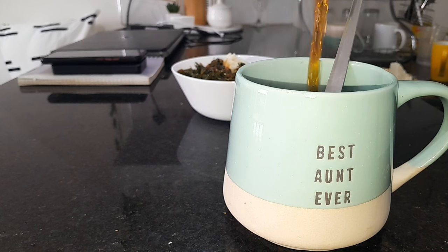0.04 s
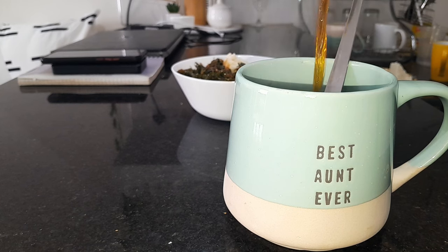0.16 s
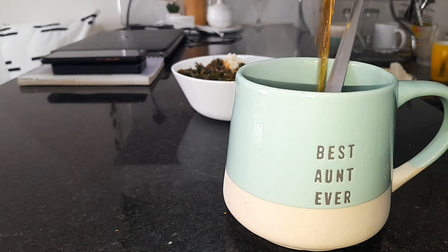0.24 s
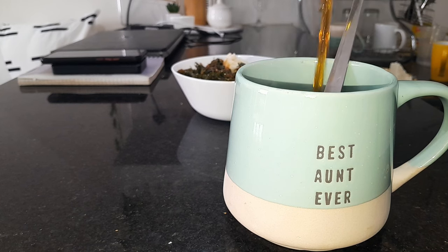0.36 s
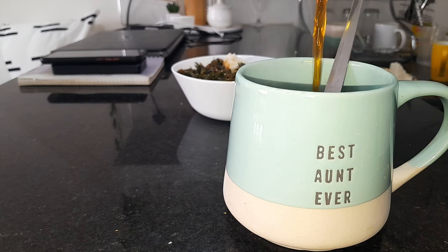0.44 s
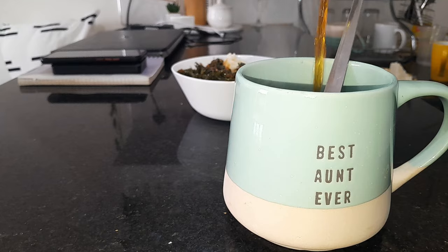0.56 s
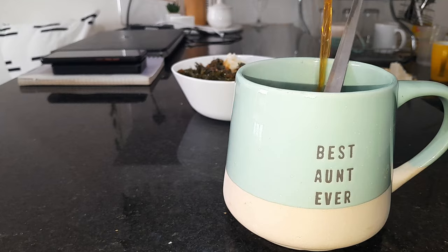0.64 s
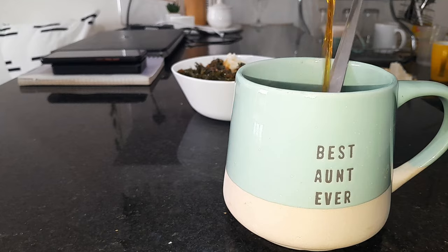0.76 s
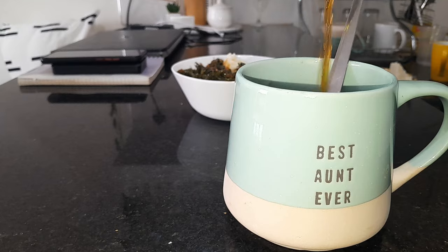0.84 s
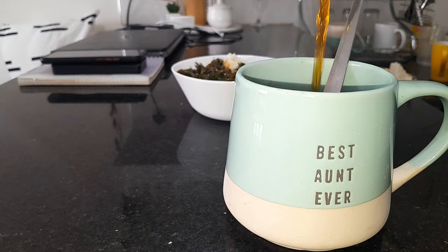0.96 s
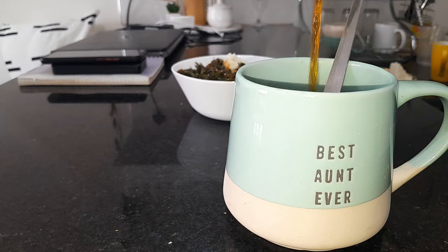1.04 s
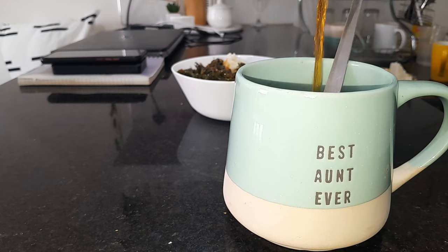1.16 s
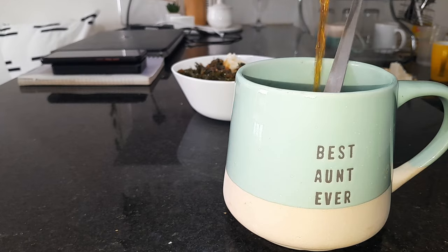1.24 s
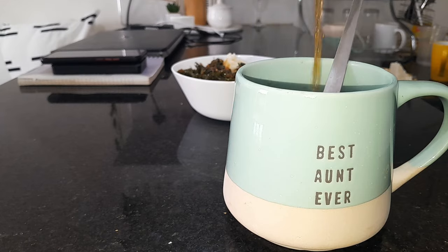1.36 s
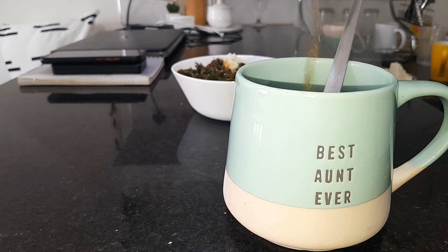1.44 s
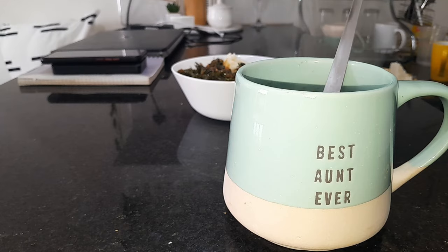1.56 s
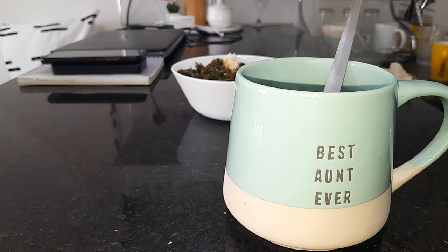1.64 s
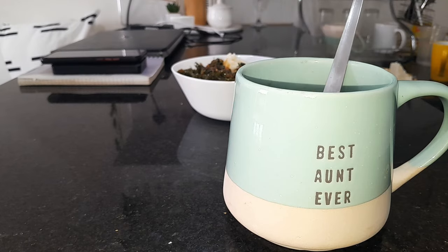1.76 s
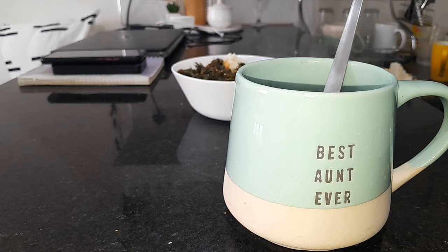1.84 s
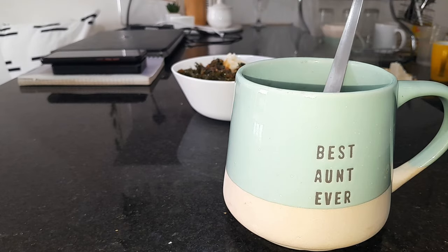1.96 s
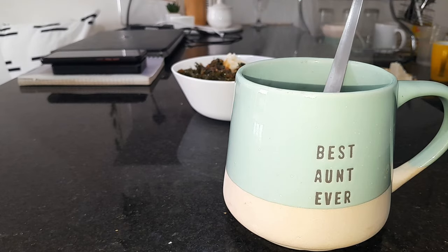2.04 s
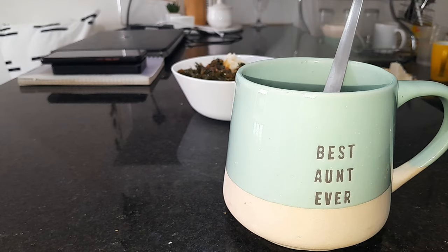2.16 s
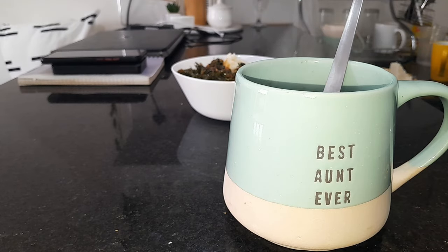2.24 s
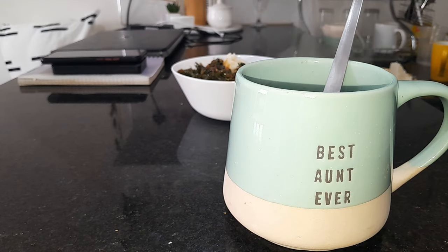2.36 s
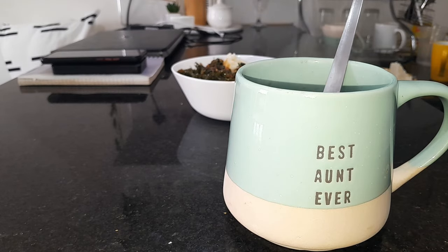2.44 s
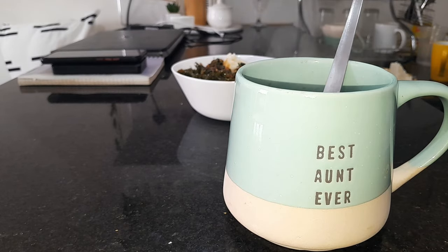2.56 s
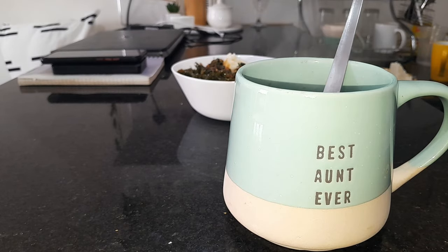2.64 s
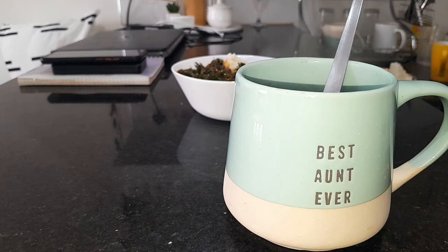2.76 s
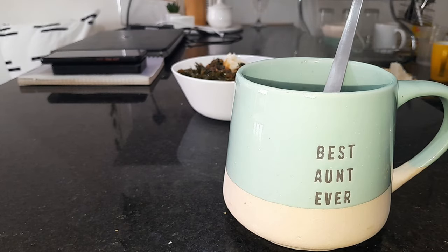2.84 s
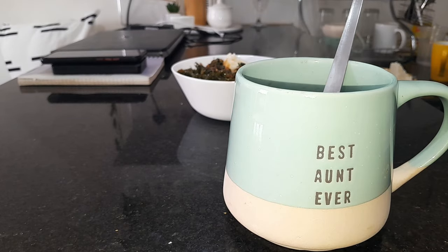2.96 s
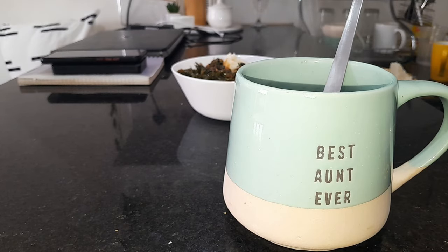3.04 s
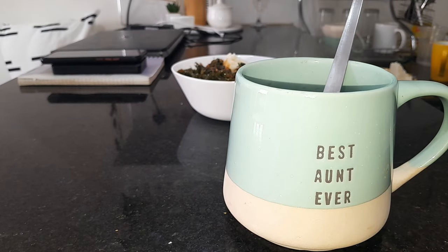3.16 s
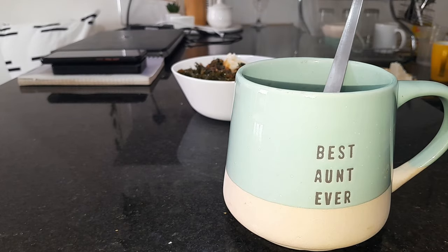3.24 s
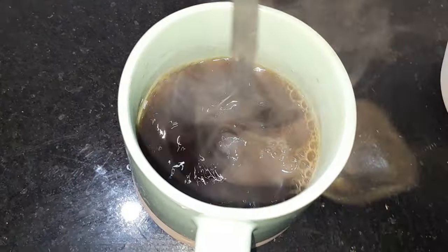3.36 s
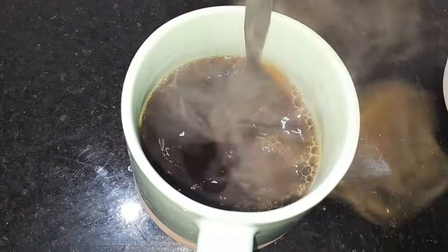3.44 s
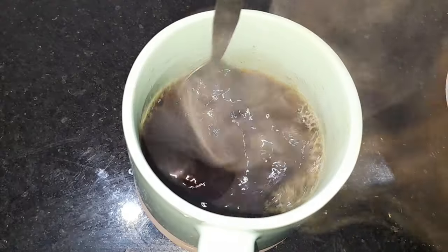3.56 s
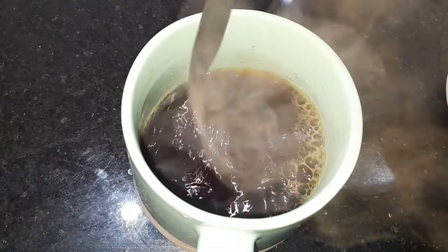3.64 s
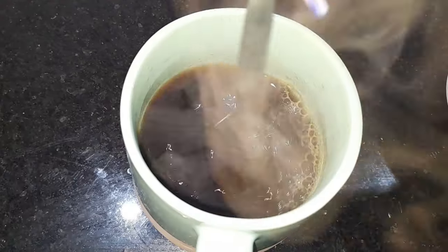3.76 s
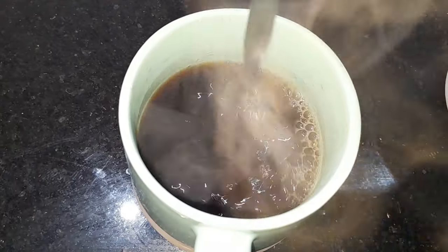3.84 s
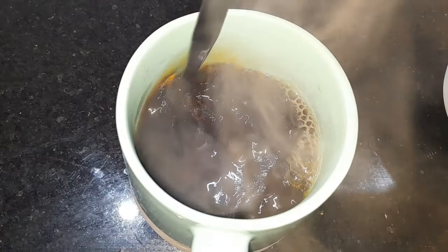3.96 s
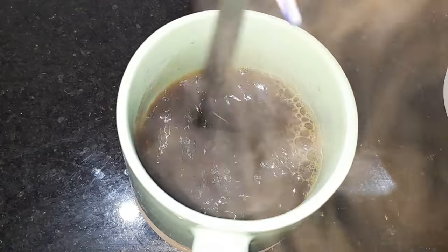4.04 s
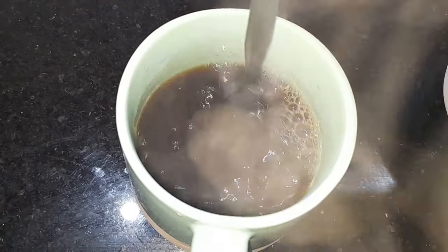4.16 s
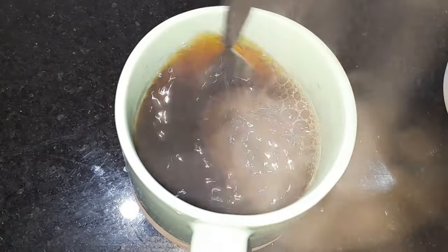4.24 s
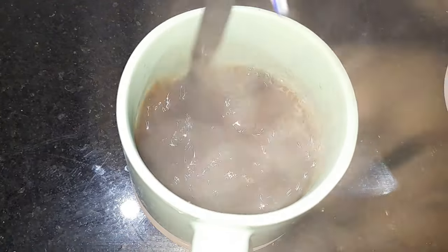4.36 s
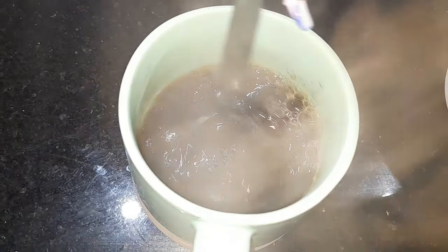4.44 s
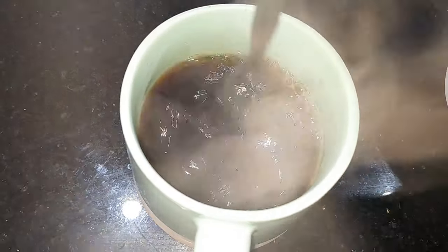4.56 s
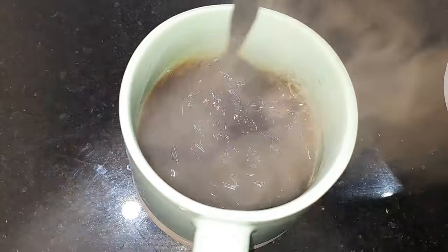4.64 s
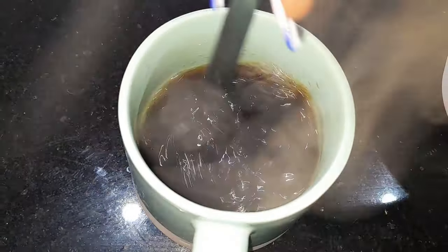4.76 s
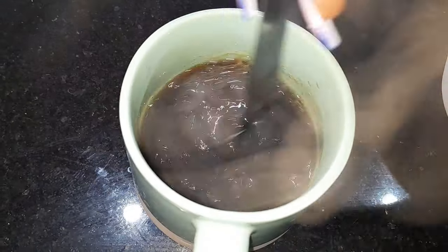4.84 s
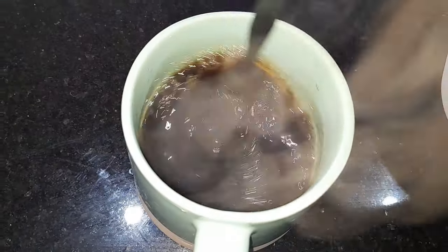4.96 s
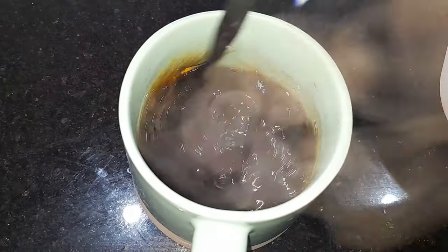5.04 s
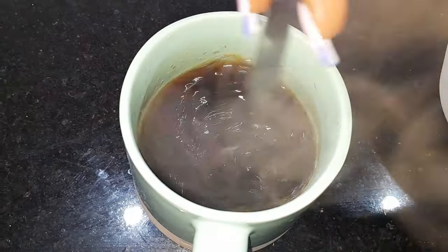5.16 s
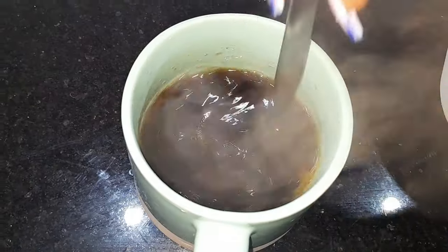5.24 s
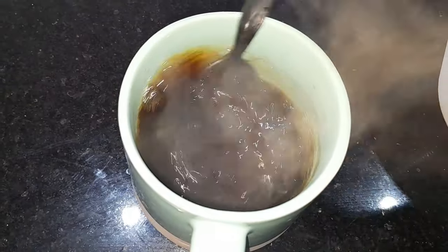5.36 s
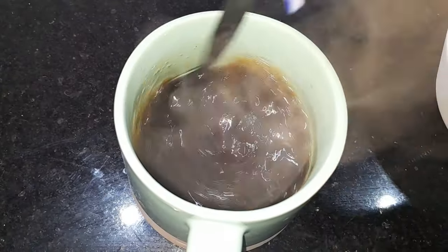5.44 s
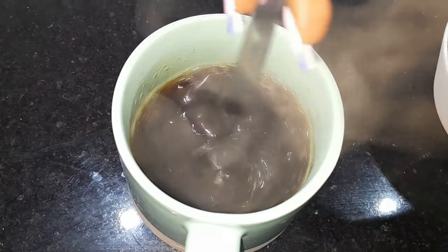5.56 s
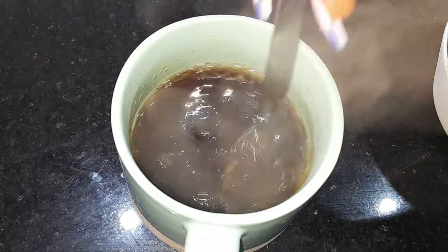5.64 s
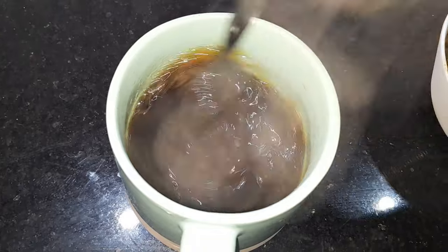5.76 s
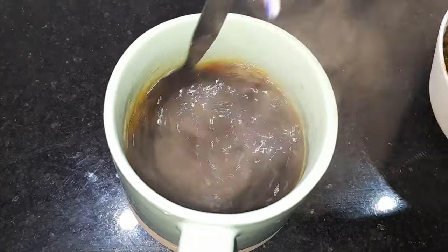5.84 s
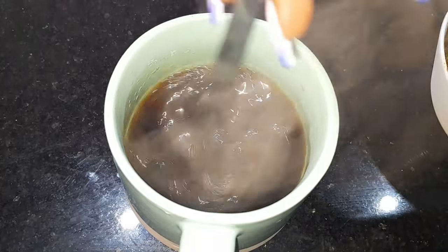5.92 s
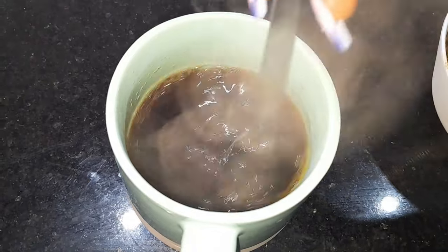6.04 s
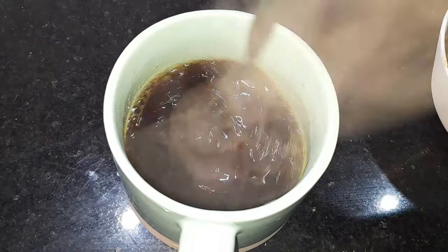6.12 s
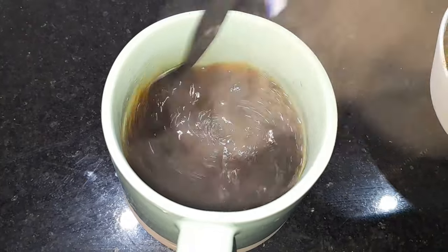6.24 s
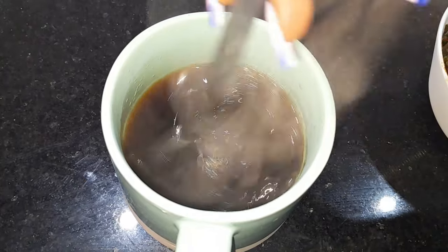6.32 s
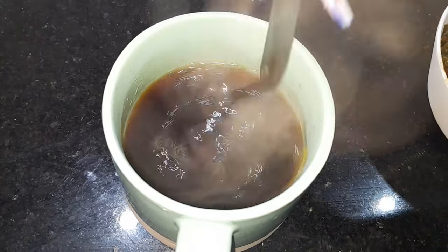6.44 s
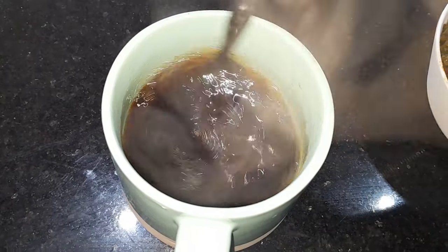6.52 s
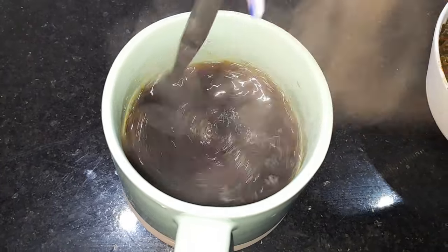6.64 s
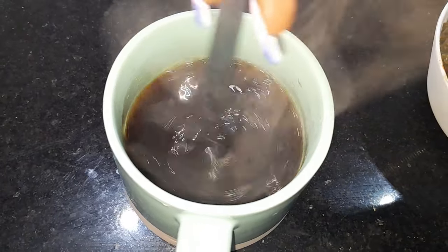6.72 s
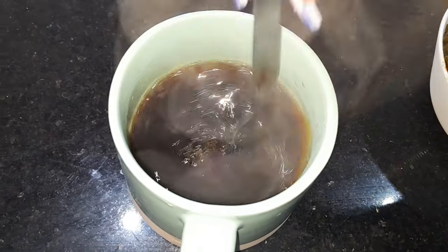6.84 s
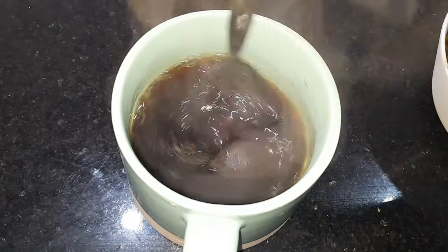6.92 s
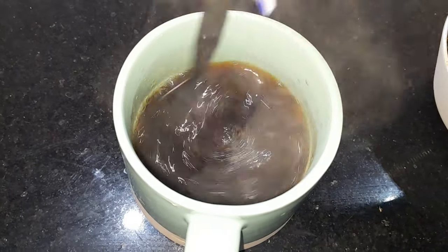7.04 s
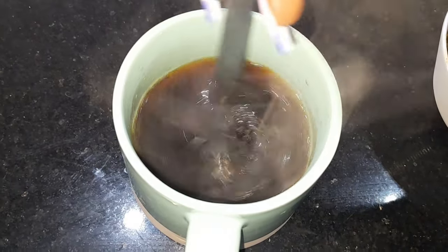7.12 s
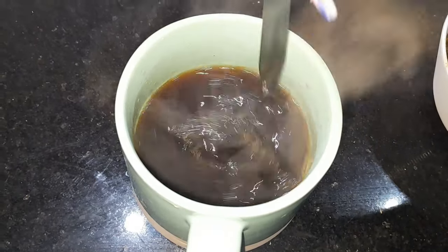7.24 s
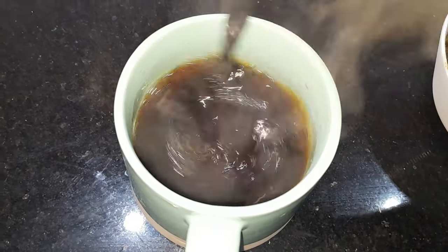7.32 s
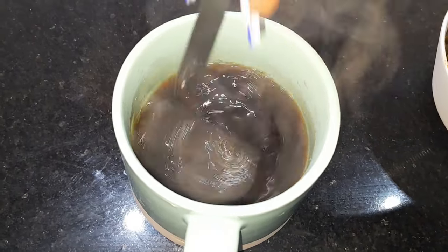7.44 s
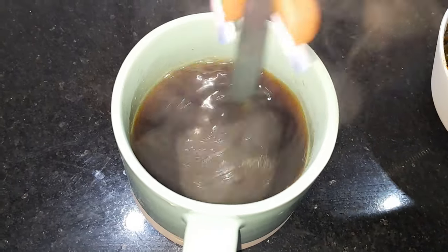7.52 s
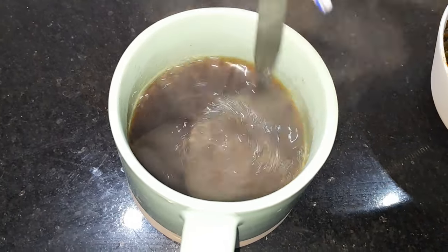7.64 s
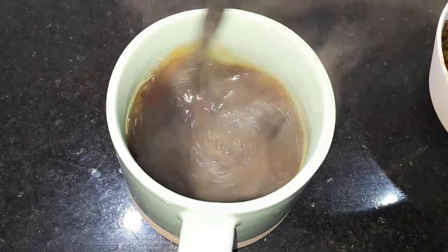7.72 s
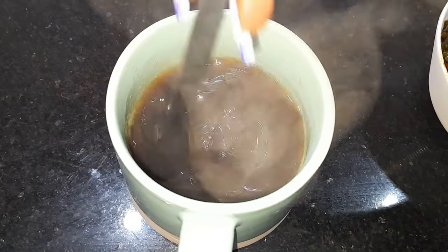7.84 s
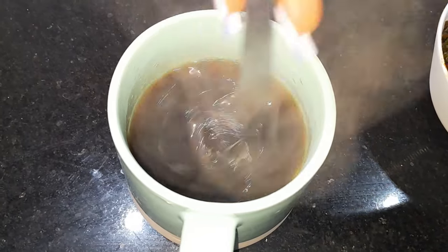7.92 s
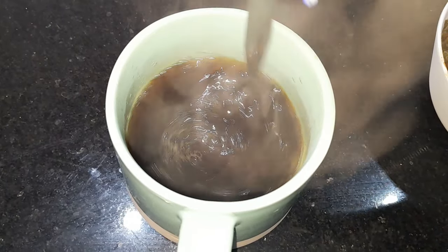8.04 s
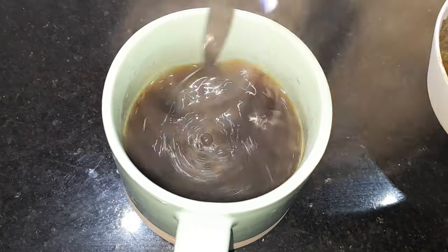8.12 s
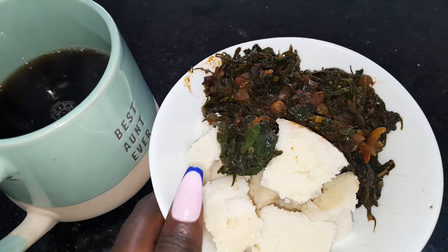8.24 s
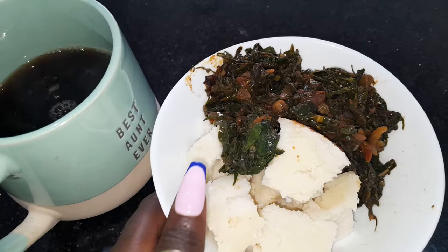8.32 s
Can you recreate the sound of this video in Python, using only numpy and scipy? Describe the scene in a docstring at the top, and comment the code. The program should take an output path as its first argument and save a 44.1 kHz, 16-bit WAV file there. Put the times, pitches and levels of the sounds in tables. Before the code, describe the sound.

Close stereo sound at a stone counter in a small live kitchen. Liquid splashes and burbles into a mug for under two seconds, followed by near silence and a dull bump. After a brief noisy rasp and loud thud, a metal spoon stirs: scattered clinks at first, then denser, brighter ringing taps, gritty drags along the glaze and small liquid plops, until it cuts off.

```python
"""Tea poured and stirred in a ceramic mug

Two close microphones at a stone counter in a small, live kitchen. Tea patters into the mug: drops ring
its air, trap bubbles and throw spray. The pot is set down, a short dry rasp passes, the mug thuds.
Then a steel spoon stirs: each touch ticks, rings the mug's modes and knocks on the counter,
the spoon drags in fine grains, and the swirling tea sloshes and plops. The hard walls answer softly."""
import sys
import numpy as np
from scipy import signal
from scipy.fft import rfft, irfft
from scipy.io import wavfile
from scipy.ndimage import uniform_filter1d

SR = 44100
rng = np.random.default_rng(int(sys.argv[2]) if len(sys.argv) > 2 else 0)


def output_pcm(signal):
    """Save a mono or channel-first signal as 16-bit PCM at the path in sys.argv[1].

    Samples are clipped to [-1, 1] before scaling.
    """
    pcm = np.clip(np.atleast_2d(signal).T, -1, 1) * 32767
    wavfile.write(sys.argv[1], SR, np.round(pcm).astype(np.int16))


N = 369999
TIME = np.arange(N) / SR
STOP_S, EDGE_HZ = 8.3175, 16100  # where the sound stops, and the top of the band

# All dB are relative unless a comment says otherwise.
# Hush of the quiet kitchen. Each row: frequency in Hz, density in dB per Hz.
FLOOR_TONE = [(15, -33), (25, -13.5), (76, -6.5), (99, -11), (161, -16.5), (242, -18), (317, -22),
              (344, -23.5), (384, -23), (560, -25), (2350, -32), (2690, -32), (5880, -37), (8360, -32),
              (16000, -40.5)]
FLOOR_DB = -59.5  # rms of the hush, dB re full scale
# How long the kitchen rings. Each row: frequency in Hz, decay t60 in s.
ROOM_DECAY = [(150, 0.41), (660, 0.32), (1700, 0.28), (4600, 0.34), (9000, 0.26), (15000, 0.45)]
# How alike the two microphones hear noise. Each row: frequency in Hz, likeness from 0 to 1.
LIKENESS = [(40, 0.27), (110, 0.61), (300, 0.91), (700, 0.15), (1500, 0), (3000, 0.34), (7000, 0.0035),
            (15000, 0)]
# Colour of the short rasp. Each row: frequency in Hz, density in dB per Hz.
RASP_TONE = [(35, -68.5), (60, -22), (190, -11), (275, -0.5), (346, -10), (651, -8), (785, -23), (862, -12),
             (1090, -19), (2090, -12.5), (2840, -21.5), (4220, -14.5), (6300, -23), (7200, -28),
             (11500, -38), (14900, -49), (16000, -84)]
RASP_S = 3.346  # start of the rasp
# Colour of the pot set down. Each row: frequency in Hz, density in dB per Hz.
POT_TONE = [(40, -20.5), (80, -18), (112, -6), (150, -30.5), (230, -23), (400, -27), (700, -25),
            (1900, -30), (2800, -46), (8000, -59.5)]
# The counter's boom under the pot. Each row: frequency in Hz, level in dB, decay t60 in s.
BOOM = [(111.6, -29.5, .25), (98, -34.5, .2)]
# Dull blows on the counter. Each row: start in s, rise in s, decay t60 in s, level in dB,
# tilt in dB per octave above 400 Hz.
THUDS = [(3.5118, 0.0016, 0.025, -2, -2.5), (3.5174, 0.0025, 0.19, -16.5, 2),
         (3.528, 0.0023, 0.17, -23, -24.5), (7.167, .002, 0.31, -48, -21.5)]
# Colour of the mug's thud. Each row: frequency in Hz, density in dB per Hz.
THUD_TONE = [(20, -26), (60, -11), (130, -4), (210, -16), (275, 7.5), (340, -9.5), (500, 5.5), (750, 8.5),
             (1050, 14.5), (1400, 3), (2000, -6), (3500, -32), (8000, -42.5)]
# The stream; the deeper it digs, the wider its gurgle. Each row: time in s, gurgle in dB,
# gain outside the core around 1 kHz in dB, spray in dB.
POUR = [(0, -40, -4.5, -67), (.17, -40.5, -25, -63), (.21, -36, -13.5, -50.5), (.35, -38, -1.5, -48.5),
        (.8, -42, 2, -44), (.93, -44, 1, -52), (1.1, -40.5, 0.5, -49), (1.3, -43.5, 8, -46.5),
        (1.42, -33, 4, -50.5), (1.63, -39, -1, -50.5)]
POUR_END_S, POUR_FALL_DB_PER_S = 1.635, 900  # the stream breaks off
# Drops heard through the air in the mug. Each row: frequency in Hz, density in dB per Hz.
GURGLE_TONE = [(100, -13.5), (230, -17), (330, -7), (570, 4), (760, -5.5), (1020, 6), (1250, -5),
               (1600, -12), (2150, -24.5), (2580, -4), (3150, -26), (5000, -32)]
# Fine spray. Each row: frequency in Hz, density in dB per Hz.
SPRAY_TONE = [(1200, -5), (2600, -12.5), (3800, -9), (5000, -8.5), (5800, -5.5), (7000, 9), (8400, -1),
              (9600, 0), (11000, -5), (16000, -6.5)]
# Small bubbles under the stream. Each row: pitch in Hz, level in dB.
BUBBLES = [(330, -8), (570, -13.5), (750, -5), (1020, 8.5), (1350, -6)]
# The wall of the filling mug, set singing by spray. Each row: pitch in Hz, level in dB.
WALL_TONE = [(4600, -11), (4950, 15), (5350, -30)]
# Big drops in the stream. Each row: start in s, gurgle in dB, spray in dB.
DROPS = [(0.187, -25.5, -23), (.307, -11, -15), (0.384, -18, -23), (.421, -19, -40), (.518, -16.5, -42),
         (.538, -16, -20.5), (0.583, -17, -36), (.679, -15.5, -40), (.746, -18, -32), (0.763, -13.5, -45),
         (.791, -9.5, -25), (.96, -21.5, -15.5), (1.118, -30, -11.5), (1.183, -17, -43),
         (1.281, -22.5, -13), (1.36, -21, -16), (1.474, -22, -18.5), (1.546, -16, -44),
         (1.597, -17.5, -16.5)]
# Trapped air pockets. Each row: start in s, peak in dB, starting pitch in Hz.
PLOPS = [(0.065, -27.5, 956), (.232, -23.5, 1000), (.24, -24, 1020), (.421, -24, 960), (.759, -20, 1080),
         (1.183, -20, 1180), (1.36, -17.5, 900), (1.521, -27, 945), (1.597, -22, 680), (3.782, -26.5, 840),
         (4.126, -24.5, 1185), (4.395, -27.5, 1020), (4.495, -31, 930), (4.745, -20.5, 1156),
         (4.796, -26.5, 697), (5.213, -28.5, 1220), (5.517, -10.5, 1277), (5.867, -16, 1240),
         (6.045, -29, 1170), (6.123, -21, 1160), (6.79, -26, 1264), (6.9, -17, 1165), (7.804, -24.5, 900),
         (7.923, -24.5, 1210), (8.023, -20, 1264)]
# A bubble swells in about one cycle; its pitch rises by twice the glide as it surfaces.
PLOP_CYCLES, PLOP_GLIDE_PER_S = 1.39, 1.8
# Strokes that churn the tea. Each row: start in s, length in s, level in dB, pitch in Hz.
SWIRLS = [(4.034, 0.09, -46.5, 1035), (4.425, 0.081, -43, 1215), (4.569, 0.11, -53.5, 1135),
          (5.149, 0.057, -46, 1380), (5.986, .15, -48.5, 1110), (6.368, 0.057, -39.5, 1330),
          (6.767, .16, -46, 1187), (7.443, 0.088, -48, 1190), (7.841, 0.086, -37.5, 1190),
          (7.989, 0.048, -43.5, 1345)]
# The spoon dragging along the wall. Each row: start in s, length in s, level in dB.
SCRAPES = [(3.812, .15, -48.5), (3.981, 0.16, -43.5), (4.237, 0.073, -45.5), (4.535, .13, -47.5),
           (4.834, 0.13, -49.5), (4.967, 0.078, -45.5), (5.167, 0.15, -52.5), (5.3, 0.1, -40),
           (5.636, 0.2, -47), (5.723, 0.11, -39.5), (5.954, 0.0234, -35.5), (6.123, 0.093, -35.5),
           (6.317, .16, -39.5), (6.484, 0.11, -39), (6.794, 0.11, -46), (7.271, 0.16, -42),
           (7.423, 0.24, -43.5), (7.675, 0.13, -46.5), (7.83, 0.13, -38.5), (7.971, .12, -39.5)]
# Grit under the sliding spoon. Each row: pitch in Hz, level in dB.
GRIT_TONE = [(1500, -3.5), (3000, -14.5), (5000, -5), (7000, -4.5), (9500, -9.5), (11700, -3.5),
             (13500, -11.5), (16000, -7)]
SKIPS_PER_S, SKIP_DB = 26, 11  # the dragging spoon skips and taps lightly, against the scrape
# Spoon touches on the mug. Each row: start in s, tick in dB, tick brightness in dB per octave above 400 Hz,
# knock in dB, mug ring in dB, spot in the wall's pattern in degrees, zing in Hz.
CLINKS = [(3.4976, -9, 6.5, -32.5, -30, 145, 7600), (3.579, -24, -1.5, -59.5, -43, 80, 5260),
          (3.7266, -30.5, 7, -36.5, -68, 67, 3400), (3.9731, -18, 1.5, -35.5, -34, 124, 3640),
          (4.2916, -22, 3, -45, -37, 135, 3750), (4.3196, -31, -8, -47, -61, 180, 3550),
          (4.3946, -31.5, -1, -39.5, -46.5, 190, 3100), (4.7443, -18.5, -6, -34, -34, 150, 2000),
          (4.7946, -22.5, -6, -38.5, -50, 280, 2230), (4.958, -24.5, 2.5, -44, -44, 130, 3900),
          (5.1735, -38, -2, -51, -57, 210, 8500), (5.2866, -13, -3, -38, -31.5, 350, 3150),
          (5.5168, -18, -6, -40, -38, 190, 3420), (5.585, -25.5, -7.5, -38.5, -51, 410, 2450),
          (5.7172, -17.5, -3.5, -42.5, -33, 73, 4660), (5.7984, -30, -9.5, -45, -45, 20, 3140),
          (5.812, -27, -8.5, -49, -52, 190, 3840), (5.8451, -25.5, -9, -35, -48, 190, 7380),
          (5.8667, -24, -5, -40, -58, 84, 3450), (5.9127, -30, -4, -40, -44, 220, 2110),
          (5.963, -25.5, 3, -72, -66, 90, 9070), (6.0445, -29.5, 7, -51.5, -63, 50, 9700),
          (6.1229, -16.5, -2, -38, -32.5, 274, 6930), (6.2973, -18.5, -.5, -34.5, -30, 190, 3890),
          (6.4817, -12.5, -2, -37, -29.5, 320, 6970), (6.5585, -22, -4, -44.5, -48, 170, 7000),
          (6.587, -27.5, -1, -44, -41, 300, 3100), (6.6472, -25, -0.5, -40.5, -37, 130, 6900),
          (6.674, -25.5, -6, -40.5, -45.5, 250, 4650), (6.79, -31, 5.5, -44.5, -45.5, 84, 3280),
          (6.9, -13, -4.5, -40, -25.5, 40, 6900), (7.123, -12, -2.5, -37.5, -23, 268, 5050),
          (7.1692, -22, 1.5, -32.5, -35, 290, 6700), (7.2617, -12.5, -3, -39.5, -27.5, 7.2, 7100),
          (7.421, -18, -1.5, -33, -37, 160, 3500), (7.6514, -11, -2, -42, -25.5, 10, 4430),
          (7.8045, -16, 4.5, -33.5, -27, 162, 3780), (7.923, -18, -8, -40.5, -40.5, 140, 5900),
          (8.0203, -13, -2.5, -44.5, -32, 83, 4650), (8.3147, -25.5, 3.5, -40, -46, 250, 4980)]
# Colour of the steel's tick. Each row: frequency in Hz, density in dB per Hz.
TICK_TONE = [(700, -38), (1500, -1.5), (2200, -15), (2900, -1), (3900, -3), (4700, 3), (5800, 0.5),
             (7100, 6), (8200, 2.5), (9500, -2), (11500, 0.5), (13500, -9.5), (16000, -3)]
# Fainter modes of rim and spoon that follow the tick. Each row: frequency in Hz, level in dB, decay t60 in s.
STEEL = [(3250, -10.5, 0.036), (3630, -15, 0.04), (4300, -23, 0.074), (4550, -7, 0.06), (5070, -18, 0.097),
         (6070, -23.5, 0.17), (7100, -9, .12), (7040, -15, 0.064), (7000, -5.5, 0.14), (7890, -28, .1),
         (8960, -4.5, 0.056), (11170, -9.5, 0.062)]
# The mug rocking on the counter. Each row: frequency in Hz, density in dB per Hz.
KNOCK_TONE = [(20, -45), (60, -13), (85, -15.5), (115, -7.5), (190, -16.5), (290, -8.5), (410, -2.5),
              (520, -11), (720, 5), (900, -6), (1300, -4), (2000, -18.5), (3500, -22.5)]
ZING_DB, ZING_CYCLES = -2, 5.9  # the spoon's thin bowl zings briefly, against the tick
SIDE_DB = 0.5  # left-right swing with the spot struck
# The mug's six main modes; the spot struck decides their mix. Each row: frequency in Hz, decay t60 in s,
# level in dB, loudest spot in degrees, swing either way in dB, right microphone's lag in degrees,
# left-right difference in dB.
MUG = [(1526, 0.4, -3.5, 286, 3.5, 55, -2), (1676, 0.35, -5.5, 218, 7, -95, -4),
       (3122, 0.3, -7.5, 315, 4.5, 5.5, -0.5), (3852, 0.11, 1.5, 130, 7, -160, -3.5),
       (4640, 0.16, -5, 9.5, 7, 56.5, 3), (4990, 0.09, -11, 320, 9.5, -30.5, 8)]
SLOSH_DETUNE = 0.0018  # the moving tea shifts the modes a little from blow to blow
PHASE_SCATTER = .17  # turns: the wall's pattern swings round with each blow


def amp(db):
    """Decibels to gain."""
    return 10 ** (np.asarray(db) / 20)


def unit(x):
    """Scales to rms 1."""
    return x / np.sqrt(np.mean(x ** 2) + 1e-20)


def read(points, hz):
    """A table's value on a log-frequency axis."""
    f, value = np.transpose(points)
    return np.interp(np.log(hz + 1), np.log(f), value)


def level(rows, axis=1):
    """Gain over time from a dB column."""
    rows = np.array(rows)
    return amp(np.interp(TIME, rows[:, 0], rows[:, axis]))


def swell(start, attack, hold, t60, db):
    """Gain over time: attack, hold and release."""
    age = TIME - start
    return np.clip(age / attack, 0, 1) * amp(db - 60 * np.maximum(age - attack - hold, 0) / t60)


def add(mix, s, sound):
    """Mixes a sound in at time s."""
    part = mix[:, max(round(s * SR), 0):][:, :sound.shape[-1]]
    part += sound[..., :part.shape[1]]


def noise(spectrum, size, tilt_db=0):
    """Coloured noise of rms 1, with a frequency-dependent likeness at the two microphones."""
    hz = np.fft.rfftfreq(size, 1 / SR)
    a, b = rfft(rng.standard_normal((2, size)))
    same = np.clip(read(LIKENESS, hz), -1, 1)
    pair = np.array([a, same * a + np.sqrt(1 - same ** 2) * b])
    tilt = tilt_db * np.log2(np.maximum(hz, 400) / SR)
    return unit(irfft(pair * amp(read(spectrum, hz) + tilt), size))


def burst(spectrum, t60, rise, tilt_db=0, size=8192):
    """A blow on something with dense, quickly dying modes."""
    t = np.arange(size) / SR
    envelope = (1 - np.exp(-t / rise)) * np.exp(-np.log(1000) * t / t60)
    return noise(spectrum, size, tilt_db) * envelope


def colour(x, spectrum, size=2048):
    """Causal minimum-phase filter: clicks ring in the spectrum's peaks."""
    log_gain = np.log(amp(read(spectrum, abs(np.fft.fftfreq(size, 1 / SR)))))
    response = np.fft.ifft(np.exp(np.conj(signal.hilbert(log_gain)))).real[:size // 2]
    return signal.oaconvolve(x, response[None], axes=1)[:, :x.shape[1]]


def patter(per_s, spread_db, scatter):
    """Random tiny impacts of uneven size, each weighted differently in the two microphones."""
    hits = rng.random(N) < per_s / SR
    size = amp(spread_db * np.minimum(rng.exponential(1, N), 3.5)) * hits
    return size * (rng.choice([-1, 1], N) + scatter * rng.standard_normal((2, N)))


def grains(spectrum, start, stop, per_s, cycles, spread_db, size=300):
    """Tiny impacts, each a short ping of its own pitch, size and direction; rms 1 from start to stop."""
    count = int((stop - start) * per_s)
    when, pitch, height, left, right, pan = rng.random((count, 6)).T[:, :, None]
    hz = np.interp(pitch, [0, 1], [spectrum[0][0], spectrum[-1][0]])
    strength = amp(read(spectrum, hz) + spread_db * np.minimum(-np.log(height), 3.5))
    turns = hz * np.arange(size) / SR
    ping = strength * (1 - np.exp(-2 * turns)) * np.exp(-turns / cycles)
    at = ((start + when * (stop - start)) * SR).astype(int) + np.arange(size)
    out = []
    for share, phase in ((pan, left), (1 - pan, right)):
        heard = ping * np.sqrt(share) * np.sin(2 * np.pi * (turns + phase))
        out.append(np.bincount(at.ravel(), heard.ravel(), N)[:N])
    return unit(np.array(out)) * np.sqrt((stop - start) * SR / N)


def pings(s, db, hz, cycles, glide=0, lag=0.00013, size=1500):
    """A tone that swells and dies within a few cycles, reaching the right microphone a little late."""
    t = np.arange(size) / SR
    age = t * hz / cycles
    turns = hz * (t * (1 + glide * t) - np.array([[0], [lag]]))
    return s, amp(db) * age * np.exp(1 - age) * np.sin(2 * np.pi * turns)


def ring(modes, size=26000, lag=0.00015, scatter=0.25):
    """Dying sines (Hz, dB, t60) that reach the two microphones in different phase."""
    t = np.arange(size) / SR
    out = np.zeros((2, size))
    for hz, db, t60 in modes:
        late = hz * lag + scatter * rng.standard_normal()  # turns
        phase = np.exp(2j * np.pi * (rng.random() - np.array([[0], [late]])))
        out += amp(db) * (phase * np.exp((2j * np.pi * hz - np.log(1000) / t60) * t)).imag
    return out


def patchy(x, patchy_db, patch_hz, patch_s):
    """Resonances come and go: the level drifts in small patches of time and frequency."""
    z = signal.stft(x, nperseg=256, noverlap=192)[2]
    bins, frames = max(round(patch_hz * 256 / SR), 1), max(round(patch_s * SR / 64), 1)
    field = uniform_filter1d(rng.standard_normal(z.shape[1:]), bins, axis=0)
    field = unit(uniform_filter1d(field, frames, axis=1))
    return signal.istft(z * unit(amp(patchy_db * field)), nperseg=256, noverlap=192)[1][:, :N]


def hush():
    """The quiet kitchen: steady noise, strongest in the bass."""
    return amp(FLOOR_DB) * noise(FLOOR_TONE, N)


def kitchen(x, size=28000):
    """Dense reflections from hard walls, each band dying at its own speed."""
    wet = [(150, 0.5), (700, -3.5), (1500, -7), (4000, -7.0), (8000, -12.0), (15000, -10)]  # (Hz, dB)
    taps = noise([(20, 0), (20000, 0)], size) * (np.arange(size) > .004 * SR)  # the first 4 ms are silent
    hz, t, z = signal.stft(taps, SR, nperseg=256)
    rate = np.log(1000) / read(ROOM_DECAY, hz)[:, None]
    z = z * np.exp(-rate * t) * np.sqrt(2 * rate / SR) * amp(read(wet, hz))[:, None]
    return signal.oaconvolve(x, signal.istft(z, SR, nperseg=256)[1], axes=1)[:, :N]


def rasp(bass_late_s=0.045):
    """A short dry rasp of noise that gains body as it goes and stops dead."""
    x = patchy(noise(RASP_TONE, N), patchy_db=2.5, patch_hz=350, patch_s=0.039)
    bass = signal.sosfiltfilt(signal.butter(2, 700, fs=SR, output="sos"), x)
    x = x - bass * (1 - np.clip((TIME - RASP_S) / bass_late_s, 0, 1))
    return x * swell(start=RASP_S, attack=0.0078, hold=0.077, t60=0.014, db=-20.5)


def counter():
    """The pot lands softly and booms the counter; the mug thuds on the stone."""
    out = noise(POT_TONE, N) * swell(start=2.905, attack=0.038, hold=0.03, t60=.085, db=-35.5)
    boom = ring(BOOM, scatter=.03)
    onset = 1 - np.exp(-np.arange(boom.shape[1]) / SR / .025)
    add(out, 2.925, boom * onset)
    for s, rise, t60, db, tilt_db in THUDS:
        add(out, s, amp(db) * burst(THUD_TONE, t60, rise, tilt_db))
    return out


def pour(gurgle_db=-4, bubble_db=-1, spatter_db=0, splash_db=-10, spray_db=-11):
    """Drops of the stream ring the air in the mug, trap bubbles and throw spray; big ones stand out."""
    end = POUR_END_S + .1
    body = unit(colour(patter(per_s=390, spread_db=4.5, scatter=0.44), GURGLE_TONE))
    bubbles = grains(BUBBLES, 0, end, per_s=110, cycles=4.5, spread_db=5.5, size=1800)
    body = body + amp(bubble_db) * bubbles
    core = signal.sosfiltfilt(signal.butter(2, [750, 1400], "band", fs=SR, output="sos"), body)
    body = core + level(POUR, axis=2) * (body - core)
    clumps = abs(uniform_filter1d(rng.standard_normal(N), size=260)) ** 1.85  # spray flies in small bunches
    spray = unit(clumps) * grains(SPRAY_TONE, 0, end, per_s=2800, cycles=1.7, spread_db=3.5, size=120)
    wall = grains(WALL_TONE, 0, end, per_s=500, cycles=16, spread_db=4)
    wall = wall * swell(start=1.274, attack=0.086, hold=.02, t60=.55, db=-44.5)
    out = amp(gurgle_db) * body * level(POUR) + amp(spatter_db) * spray * level(POUR, axis=3) + wall
    out = patchy(out, patchy_db=3, patch_hz=400, patch_s=.02)
    out = out * amp(-POUR_FALL_DB_PER_S * np.maximum(TIME - POUR_END_S, 0))
    for s, db, fine_db in DROPS:
        add(out, s, amp(db + splash_db) * burst(GURGLE_TONE, t60=0.03, rise=0.00055))
        add(out, s, amp(fine_db + spray_db) * burst(SPRAY_TONE, t60=0.017, rise=0.00024))
    return out


def plops():
    """Air pockets trapped by the stream or the spoon ring once."""
    out = np.zeros((2, N))
    for s, db, hz in PLOPS:
        add(out, *pings(s, db, hz, PLOP_CYCLES, PLOP_GLIDE_PER_S))
    return out


def slosh(slosh_db=-1, width_hz=110):
    """Small bubbles ring the air above the swirling tea."""
    out = np.zeros((2, N))
    bubbles = patter(per_s=200, spread_db=5.0, scatter=0.54)
    for s, length, db, hz in SWIRLS:
        cavity = signal.iirpeak(hz, hz / (2 * width_hz), SR)
        part = bubbles[:, int(s * SR):][:, :int(length * SR)]
        churn = signal.lfilter(*cavity, signal.lfilter(*cavity, part))
        add(out, s, amp(db + slosh_db) * unit(churn * signal.windows.tukey(part.shape[1], .6)))
    return out


def drag(drag_db=-2, slip_db=4.0, skip_ring_db=-10):
    """The spoon slips over the glaze in fine grains and skips, each skip a light tap."""
    pressure = np.zeros((1, N))
    for s, length, db in SCRAPES:
        add(pressure, s, amp(db + drag_db) * signal.windows.tukey(int(length * SR), .5))
    drift = unit(uniform_filter1d(rng.standard_normal(N), size=400))
    slips = unit(amp(slip_db * drift))  # the spoon catches and slides
    grit = grains(GRIT_TONE, 0, N / SR, per_s=6000, cycles=6, spread_db=3, size=120)
    grit = patchy(grit, patchy_db=4.5, patch_hz=800, patch_s=.025)
    skips = pressure * rng.random(N) * (rng.random(N) < SKIPS_PER_S / SR)
    tap = burst(TICK_TONE, t60=.012, rise=.0003) + amp(skip_ring_db) * ring(STEEL, size=8192)
    taps = signal.oaconvolve(skips, tap, axes=1)[:, :N]
    return pressure * slips * grit + amp(SKIP_DB) * taps


def clinks(tick_db=4.5, steel_db=-14, knock_db=2, tick_t60=0.019):
    """Steel ticks on the glaze, rings rim and spoon, and rocks the mug on the counter."""
    out = np.zeros((2, N))
    for s, db, bright, rock_db, ring_db, spot, zing_hz in CLINKS:
        side = unit(amp(SIDE_DB * np.cos(np.radians(spot)) * np.array([[.5], [-.5]])))
        tick = burst(TICK_TONE, t60=tick_t60, rise=0.00058, tilt_db=bright)
        add(out, s, amp(db + tick_db) * side * tick)
        add(out, *pings(s, db + ZING_DB, zing_hz, ZING_CYCLES))
        # the grip and the depth of the spoon shift its modes from blow to blow
        shifted = [(hz * (1 + 0.0089 * rng.standard_normal()), mode_db + 3 * rng.standard_normal(), t60)
                   for hz, mode_db, t60 in STEEL]
        add(out, s, amp(db + steel_db) * side * ring(shifted, size=9000))
        add(out, s, amp(rock_db + knock_db) * burst(KNOCK_TONE, t60=0.28, rise=0.0014))
    return out


def mug_ring(mug_db=4.5):
    """Each touch rings the mug's modes; a mode is loudest where the spoon meets its antinode."""
    out = np.zeros((2, N))
    for s, db, bright, rock_db, ring_db, spot, zing_hz in CLINKS:
        damping = 1 + 0.04 * rng.standard_normal()  # the spoon lingers on the wall or springs clear
        for hz, t60, mode_db, best, swing_db, late_deg, side_db in MUG:
            strength = ring_db + mug_db + mode_db + swing_db * np.cos(np.radians(spot - best))
            mode = (hz * (1 + SLOSH_DETUNE * rng.standard_normal()), strength, t60 / damping)
            side = unit(amp(side_db * np.array([[.5], [-.5]])))
            lag = np.radians(late_deg) / (2 * np.pi * hz)
            add(out, s, side * ring([mode], size=18000, lag=lag, scatter=PHASE_SCATTER))
    return out


def scene(spoon_left_db=1.37, ring_echo_db=-6, rasp_echo_db=-15):
    """Everything on the counter, a short rasp with a faint echo, and the room's hush."""
    spoon = (clinks() + slosh() + drag()) * amp([[spoon_left_db], [-spoon_left_db]])
    near = pour() + plops() + spoon + counter()
    mug = mug_ring()  # the mug's ring, with a softer echo than the spoon's ticks
    dry_rasp = rasp()
    echo = kitchen(near + amp(ring_echo_db) * mug + amp(rasp_echo_db) * dry_rasp)
    return near + mug + echo + dry_rasp + hush()


def record(dry):
    """Full-scale limit, an abrupt stop, and the band limit."""
    held = np.clip(dry, -1, 1) * (TIME < STOP_S)
    low_pass = signal.firwin(255, EDGE_HZ, window=("kaiser", 9), fs=SR)
    return signal.oaconvolve(held, low_pass[None], "same")


dry = scene()
out = record(dry)
output_pcm(out)
```